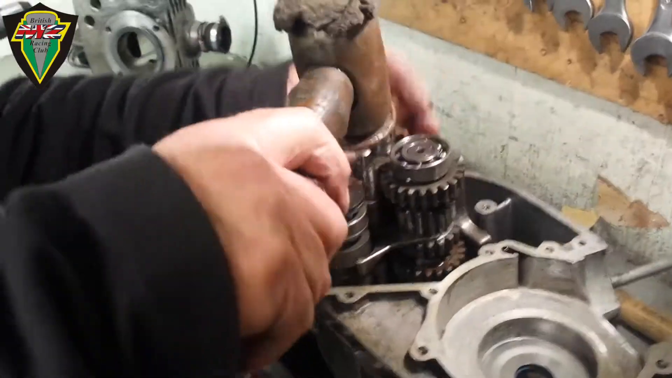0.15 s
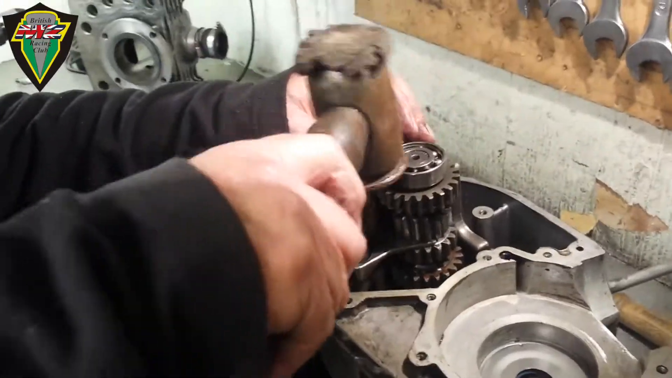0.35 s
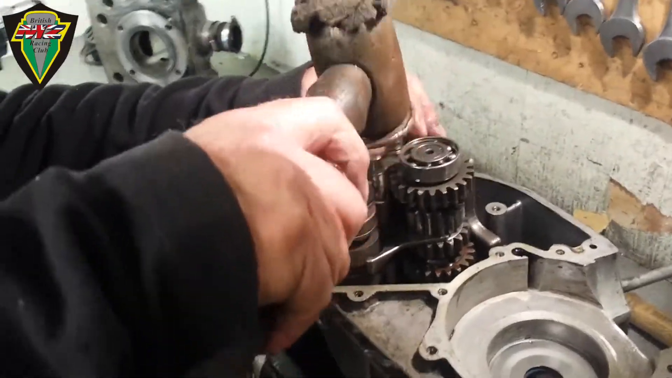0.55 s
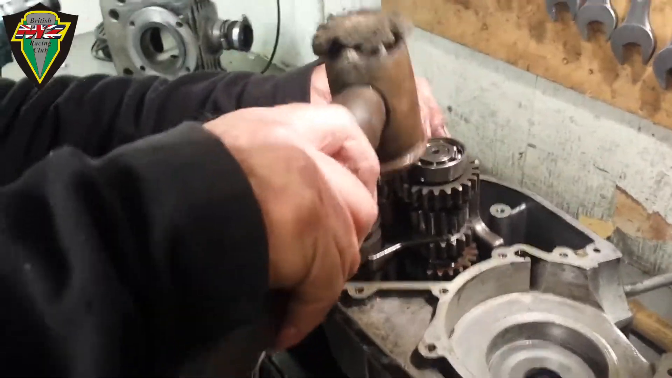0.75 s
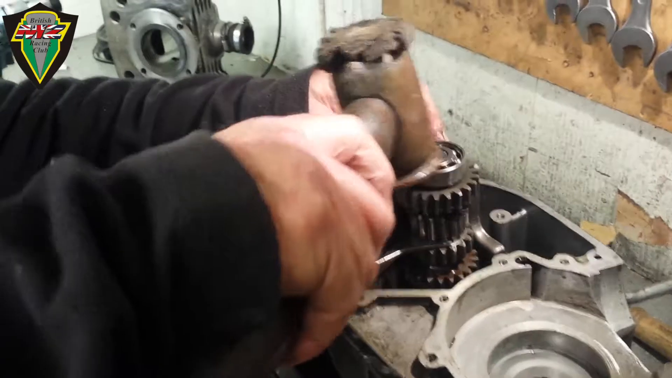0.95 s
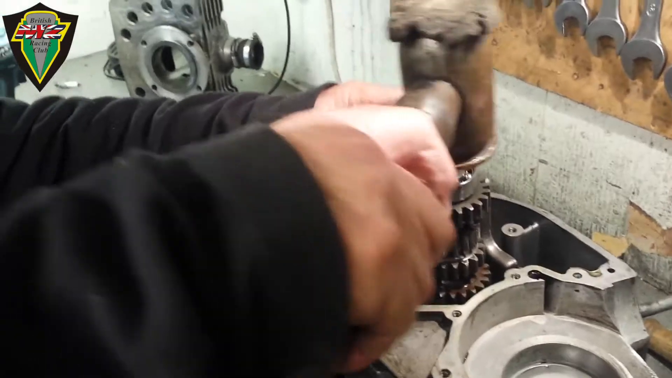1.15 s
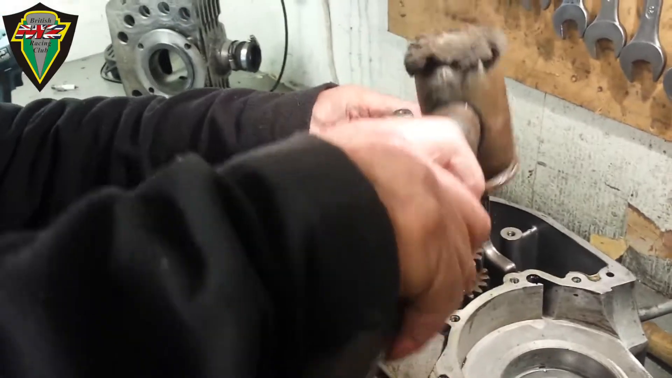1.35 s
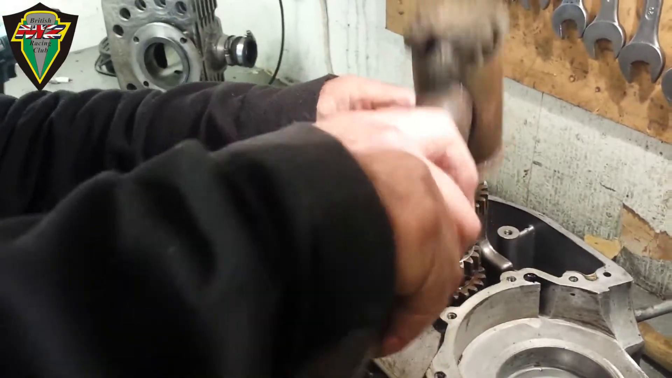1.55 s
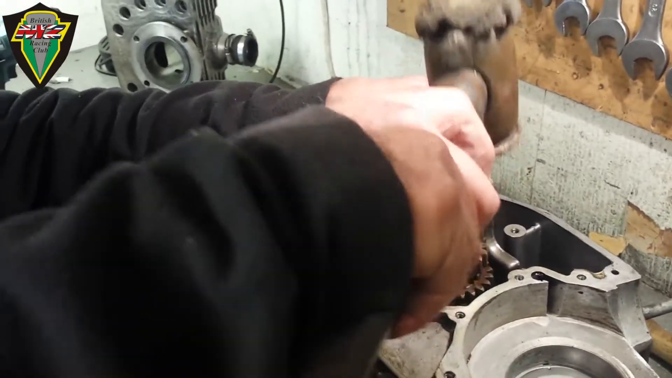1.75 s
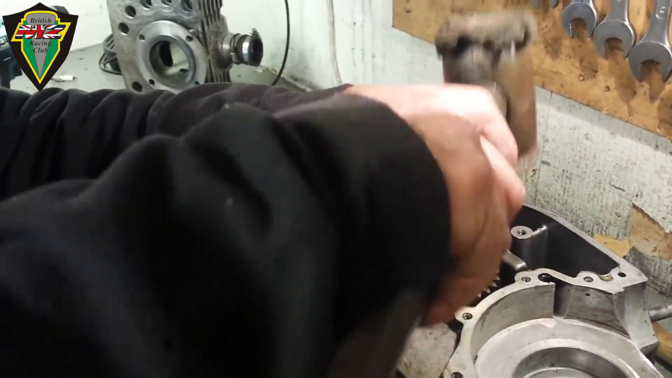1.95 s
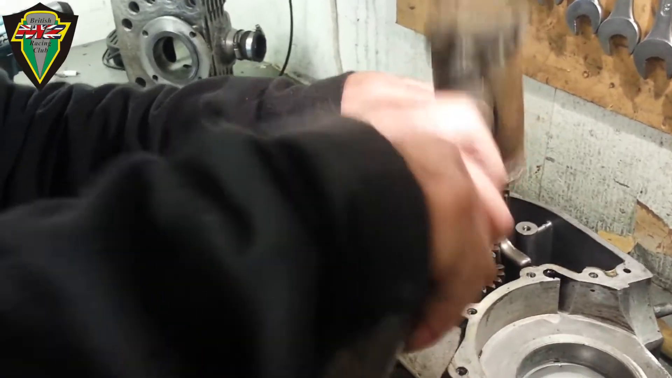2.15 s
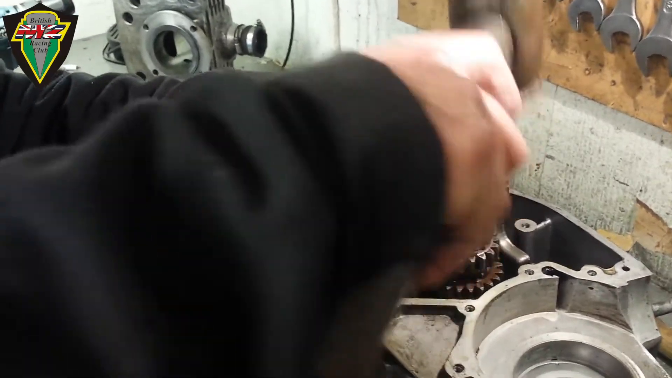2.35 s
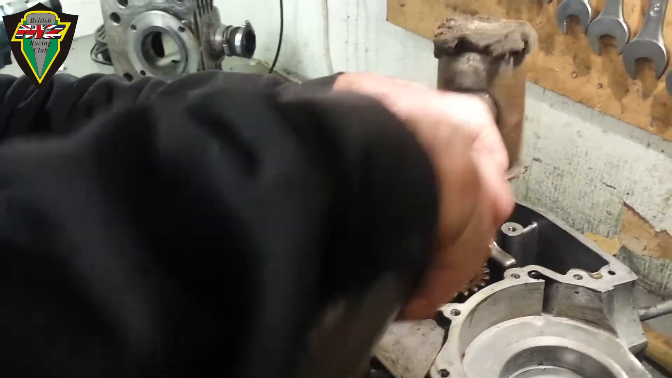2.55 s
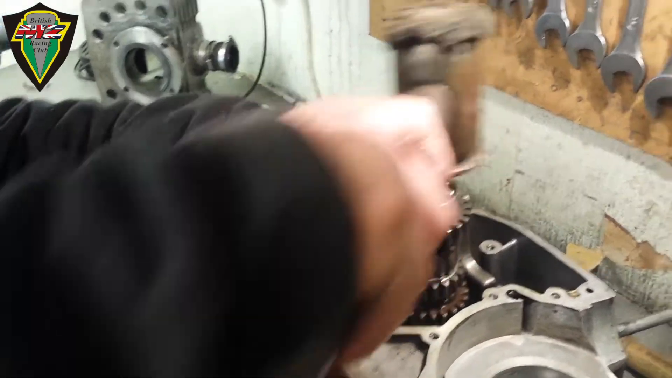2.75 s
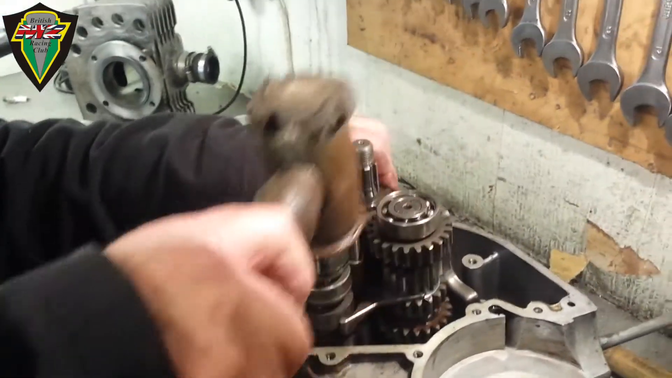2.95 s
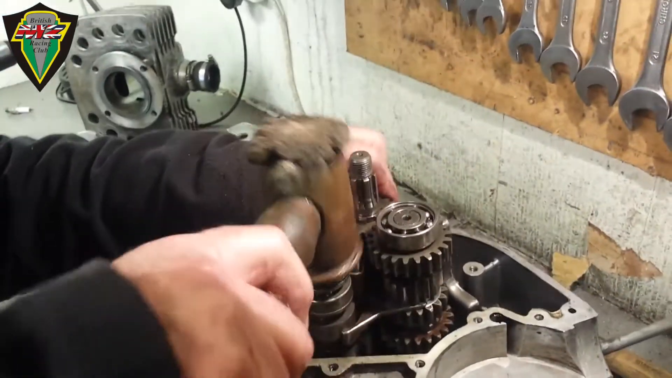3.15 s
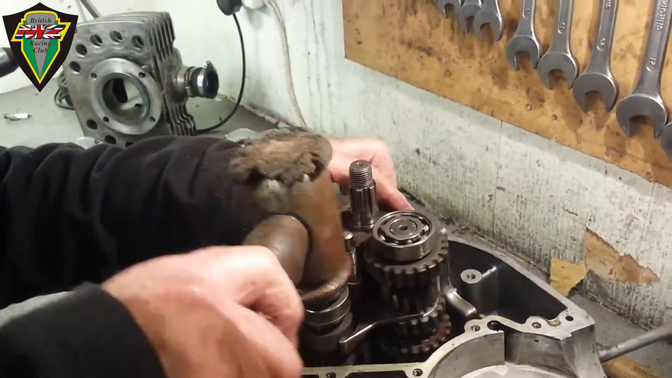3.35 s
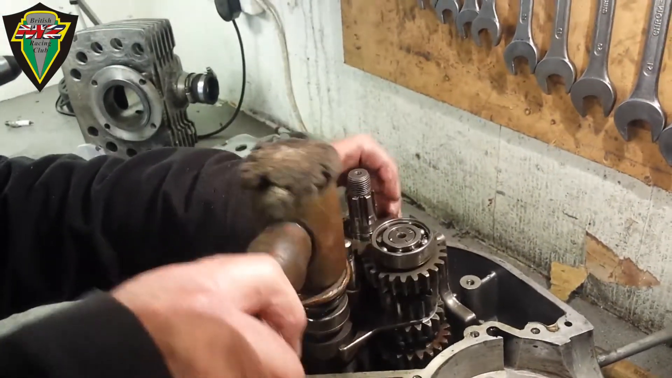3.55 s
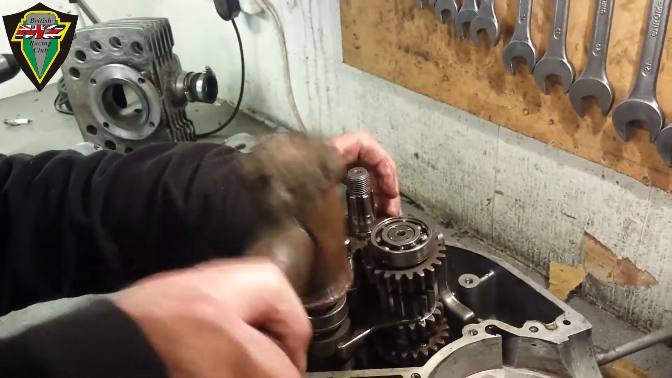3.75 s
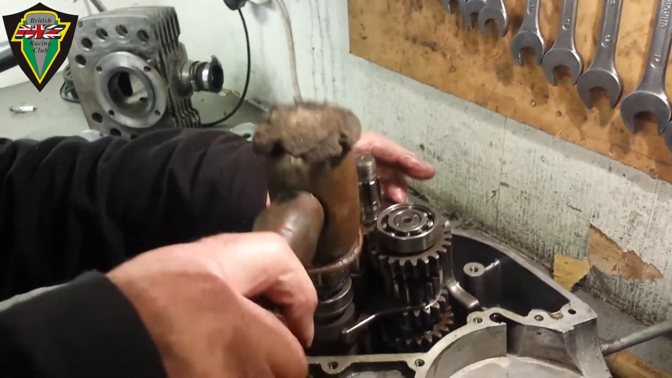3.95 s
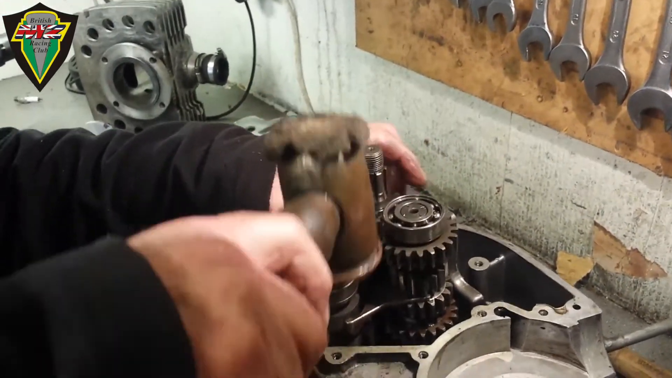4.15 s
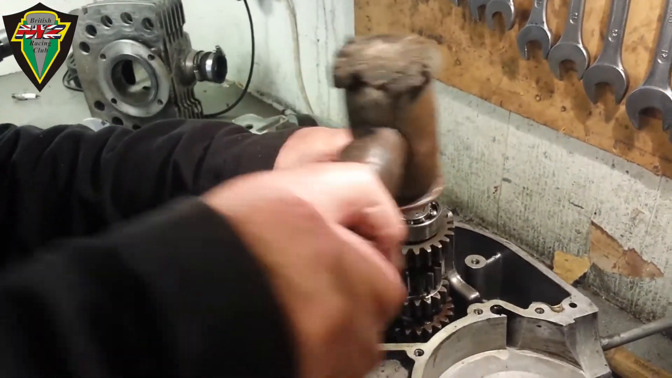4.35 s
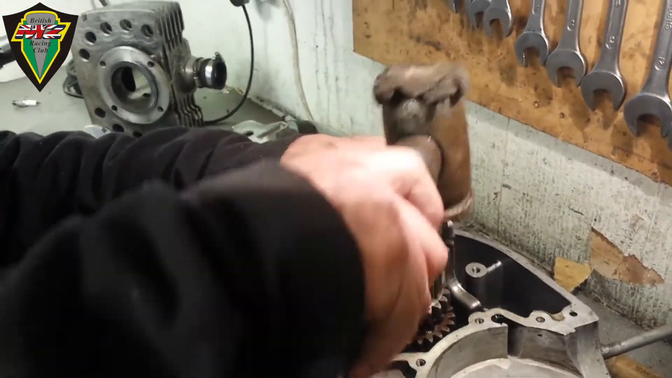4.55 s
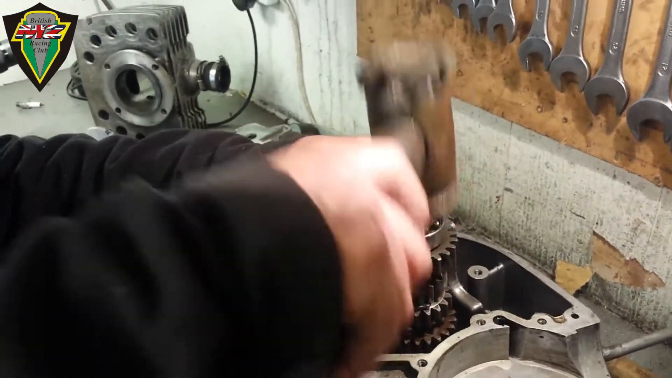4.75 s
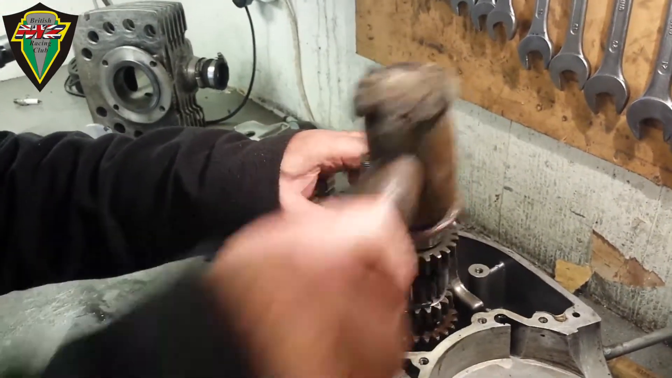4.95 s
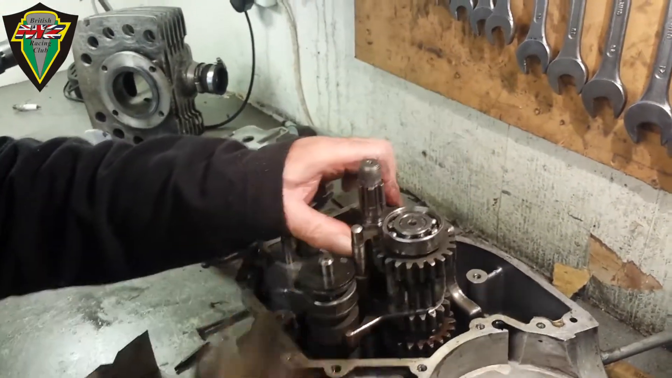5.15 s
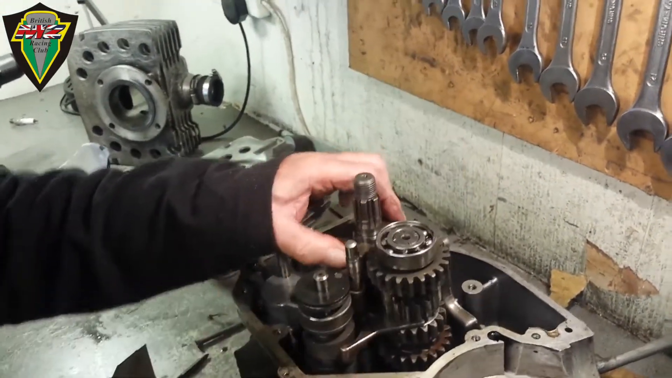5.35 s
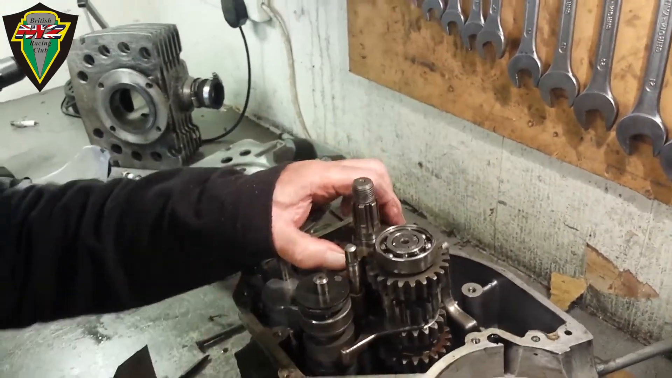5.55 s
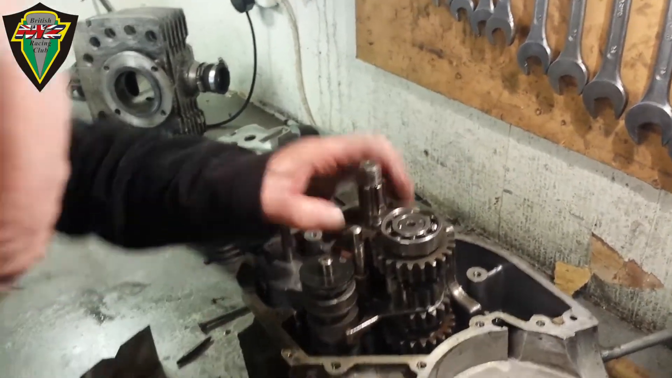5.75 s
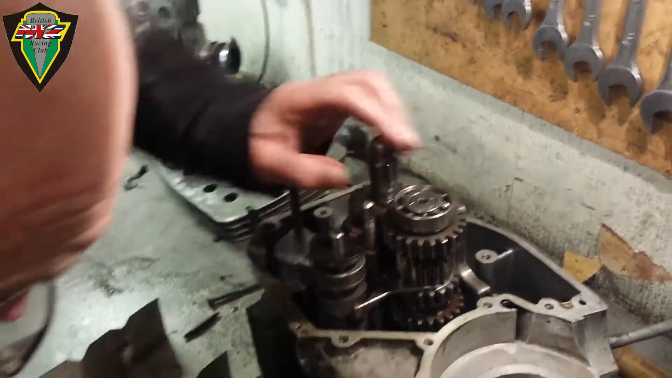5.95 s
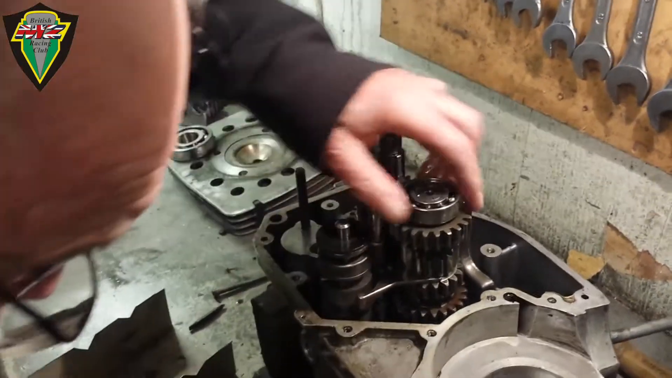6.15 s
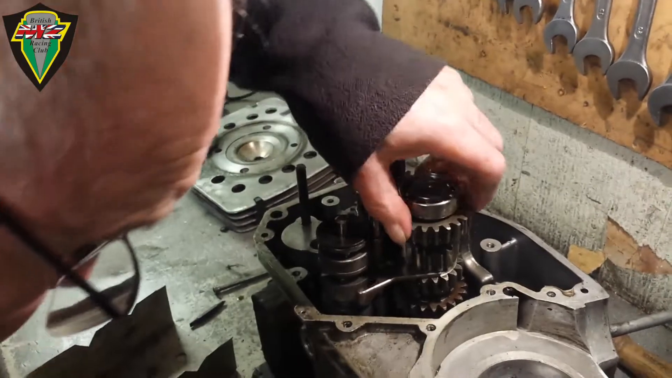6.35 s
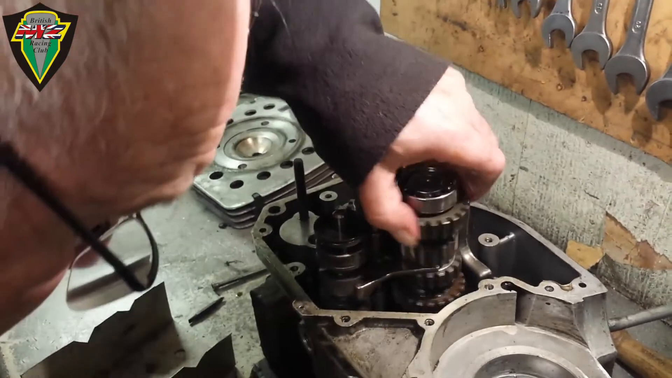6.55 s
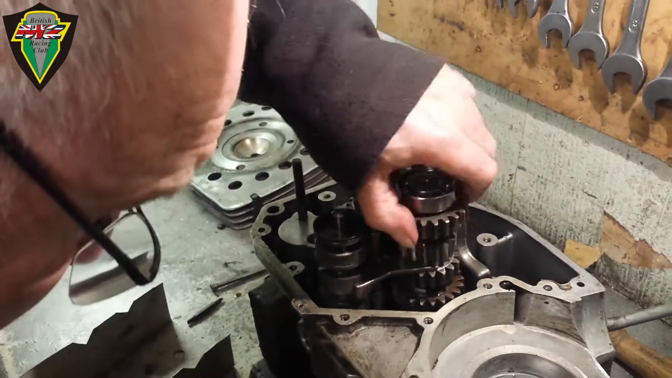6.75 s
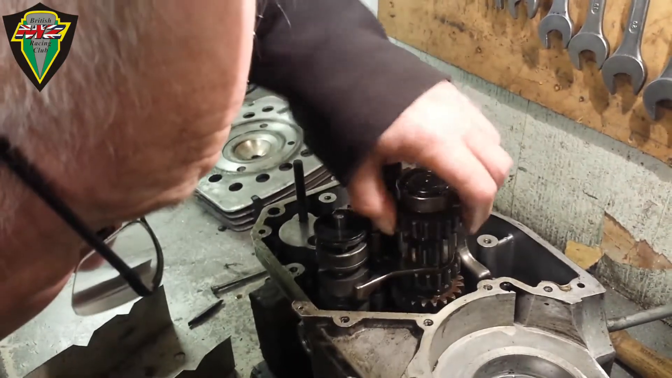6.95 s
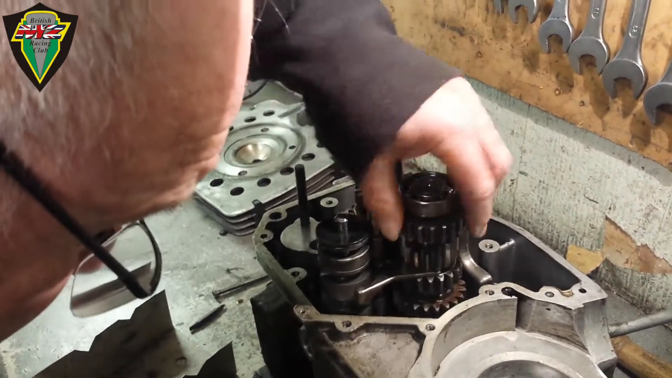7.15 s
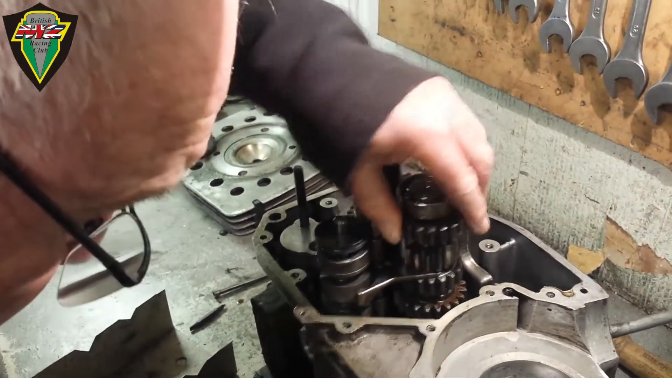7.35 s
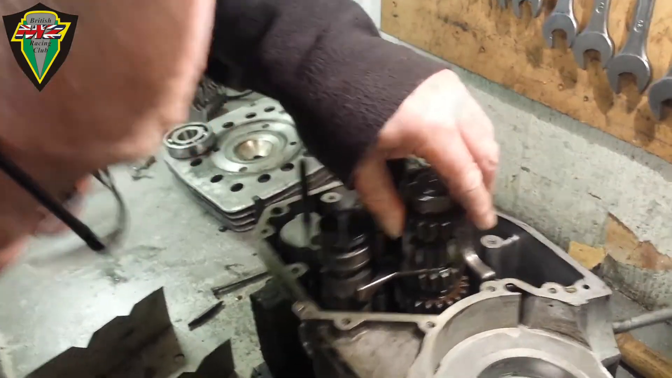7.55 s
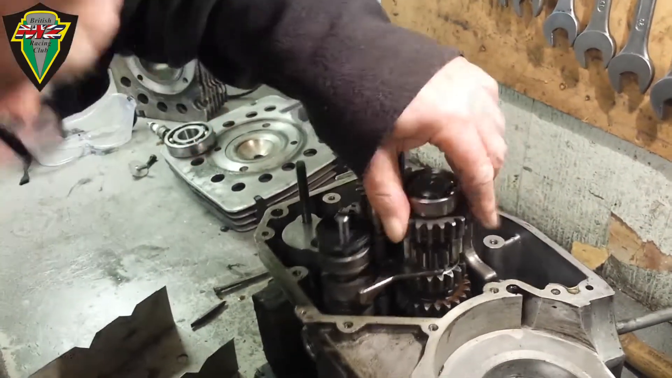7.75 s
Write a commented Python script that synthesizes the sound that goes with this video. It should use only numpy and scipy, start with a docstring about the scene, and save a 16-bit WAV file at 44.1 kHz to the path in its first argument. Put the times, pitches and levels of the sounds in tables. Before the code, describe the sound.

A run of light, slightly uneven hammer taps clanks on steel shafts in an engine casing, each ringing briefly and thudding through the workbench. After about five seconds the hammer clunks down on the bench. Quieter, irregular clicking and rattling follows as the gears are turned by hand, with low bumps from the rocking casing. The microphone is close, in a small room with faint background hum and hiss.

```python
"""In a small workshop, close to a workbench, a hammer taps gear shafts into an open engine casing.
Each blow chatters through the loose gears, rings the casing and the hammer head, and thumps the bench.
The hammer is laid down, then a hand turns the gears: teeth click and rub, and the casing rumbles
on the bench. Behind it all, a murmur, hum and hiss sink during the hammering and swell back after it."""
import sys
import numpy as np
from scipy import signal
from scipy.fft import rfft, irfft
from scipy.io import wavfile

SR = 44100
rng = np.random.default_rng(int(sys.argv[2]) if len(sys.argv) > 2 else 0)


def digitize_waveform(pressure):
    """Quantize a signal to 16-bit integers and store it at the path in sys.argv[1].

    Rows of a 2-D input are taken as channels; values are limited to [-1, 1].
    """
    field = np.atleast_2d(pressure).T
    bounded = np.clip(field, -1, 1)
    quanta = np.round(bounded * 32767).astype(np.int16)
    wavfile.write(sys.argv[1], SR, quanta)


N = 344421
AGE = np.arange(int(.7 * SR)) / SR  # seconds since a hit began

# Levels in the tables compare one row with another. t60 is the time a ring takes to fade by 60 dB.
# hammer blows: t/s, spot, clang/dB, thud/dB, brightness/dB, head ring/dB, favoured casing pitch f/Hz
HAMMER_BLOWS = [(.4335, "shaft", -30.5, -27, 4, -56, 2530), (.7365, "shaft", -30, -13, 10.5, -55, 4050),
                (.9645, "shaft", -28, -17, 2.5, -40, 3300), (1.3865, "bearing", -19, -15, 3, -36, 1780),
                (1.682, "bearing", -21.5, -20, -5, -45, 1780),
                (1.969, "bearing", -21, -20.5, -3.5, -35.5, 3300),
                (2.269, "bearing", -21.5, -20, 0, -32.5, 2300),
                (2.5982, "bearing", -16.5, -14.5, 1, -31.5, 2320),
                (3.214, "drum", -45, -35, -30.5, -79, 2100), (3.402, "drum", -29, -26, 1, -55, 2500),
                (3.602, "drum", -24, -21.5, 2.5, -38, 2800), (3.8755, "drum", -22, -20.5, -5, -56, 2310),
                (4.1445, "drum", -17, -21, -13.5, -39, 2330), (4.5804, "gears", -25, -18.5, 6.5, -34, 2810),
                (4.9253, "gears", -21, -17.5, 2, -52, 2800)]
# the hammer lands on the bench and tips over: same columns
HAMMER_LANDINGS = [(5.575, "bench", -33, -18.5, -9.5, -32, 2800),
                   (5.805, "bench", -45.5, -19.5, 8, -37.5, 1360), (5.85, "bench", -51, -27, -8, -70, 1360),
                   (5.884, "bench", -46, -29, -11, -63, 1360)]
# how each struck spot sounds, by name: knock/dB, tick/dB, bench sway/dB (added to the thud level)
STRUCK_SPOTS = {"shaft": (-6.5, .5, -2), "bearing": (-13, -8, -11), "drum": (-5.5, -4.5, -8),
                "gears": (-7, -7.5, -13), "bench": (-0.64, -1.06, -18)}
# a blow sets a loose gear ringing: t/s, level/dB
LOOSE_GEAR_RINGS = [(2.825, -48), (3.216, -48), (3.877, -33), (4.146, -38)]
# the clearest gear teeth meeting: t/s, level/dB, sizzle/dB (added to the level)
TOOTH_CLICKS = [(2.149, -55, -28), (2.8238, -45.5, -2), (3.0058, -55.5, -25), (3.817, -46.5, -27.5),
                (3.9682, -46, -25), (5.3532, -51.5, -33), (5.7264, -55, -32), (6.4857, -43.5, -6),
                (6.7356, -30.5, -34), (6.8919, -32.5, -34), (6.9161, -35, -16), (6.9353, -25, -21),
                (7.003, -31.5, -6.5), (7.0828, -40, -12), (7.134, -41, -10), (7.3244, -35, -30),
                (7.376, -25, -16), (7.4444, -27.5, -18), (7.4929, -29.5, -10), (7.5136, -33.5, -14),
                (7.5639, -32, -32), (7.6125, -31.5, -9.5), (7.675, -33, 0.5), (7.8008, -31.5, -38)]
# the casing rocks on the bench: t/s, level/dB
CASING_BUMPS = [(.009, -35), (6.933, -35), (7.422, -28.5), (7.578, -33.5), (7.715, -26), (7.793, -26.5)]
# how hard the hand turns the gears: t/s, effort/dB
HAND_EFFORT = [(6.7, -8), (6.87, -23), (6.95, -3), (7.12, -17.5), (7.29, -14), (7.39, -1), (7.6, -1.5),
               (7.81, -6.5)]

# A mode is one of the tones an object rings with when it is struck.
# shafts and casing: f/Hz, level/dB, t60/s
CASING_MODES = [(760, -12, .06), (890, -12, .06), (1360, -9, .05), (1780, 2, .07), (2060, -4, .09),
                (2320, 2, .07), (2560, -5, .06), (2805, -1.5, .06), (3310, -3, .06), (4060, -7, .04),
                (4550, -8, .04), (5045, -9, .04), (5370, -10, .04), (6950, -13, .04)]
# hammer head: f/Hz, level/dB, t60/s
HEAD_MODES = [(5480, -16, .1), (5645, 0, .14), (5700, -5, .09), (7780, -14, .12), (11350, -15, .1),
              (13065, -14, .12), (14850, -24, .1)]
# a loose gear: f/Hz, level/dB, t60/s
GEAR_MODES = [(2062, 0, .48), (2300, -8, .3), (2570, -5, .42)]
# bench and casing as one heavy body: f/Hz, level/dB, t60/s
BENCH_MODES = [(135.2, 0.5, 0.12), (169.4, 1.5, 0.071), (210.9, 7, 0.053), (252.3, -4, 0.1), (279, -4, 0.1),
               (307.7, -3, 0.091), (342.4, -6.5, 0.11), (382.6, -10.5, 0.08), (452.5, -12.5, 0.066),
               (531.8, -17, 0.14), (623.3, -22, 0.2)]
# the bench top under the falling hammer: f/Hz, level/dB, t60/s
BENCH_TOP_MODES = [(147, 8, 0.07), (199, 14.5, 0.033), (298, 2, 0.093), (337, 8.5, 0.078),
                   (398.6, -5.5, 0.21), (499, 10.5, 0.033), (543, 1, 0.042), (610, 2, 0.069)]
# the whole bench swaying on its legs: f/Hz, level/dB, t60/s
SWAY_MODES = [(44.6, -3.5, 0.18), (58.5, -3, 0.55)]

# A spectrum says how strong a sound is from low pitch to high.
# dense ring of all the gears together: f/Hz, level/dB
METAL_SPECTRUM = [(150, -18.5), (400, 3), (700, 12), (1100, 6), (1900, 8), (3000, -1), (4500, -6),
                  (6300, -6), (8000, -18), (11000, -22), (15000, -37.5)]
# teeth clicking and rubbing: f/Hz, level/dB
TEETH_SPECTRUM = [(530, -10), (900, -8), (989, -15), (1600, 2), (1850, 5.5), (2850, 2), (3030, -2.5),
                  (4900, -1), (8430, -24.5), (11200, -40), (15000, -53)]
# the casing rumbling on the bench: f/Hz, level/dB
RUMBLE_SPECTRUM = [(18, -26), (30, -19), (54, 4), (86, -11.5), (130, 4.5), (183, -10.5), (220, -1.5),
                   (366, -10.5), (407, -14), (538, -24), (1200, -29), (1560, -41), (2640, -120)]
# low workshop murmur: f/Hz, level/dB
MURMUR_SPECTRUM = [(15, -27), (25, 1), (115, -1.5), (297, -3.5), (350, 6.5), (391, -2), (703, -3.5),
                   (814, -14), (943, -9.5), (1360, -16.5), (1760, -25.5), (2000, -26), (2600, -70.5),
                   (4400, -120)]
# background hiss: f/Hz, level/dB
HISS_SPECTRUM = [(880, -3), (1500, 1.5), (1750, -9), (1900, -2), (4310, -5.5), (8460, -11.5), (9890, -10),
                 (15500, -19)]
# faint tones of hum and whine: f/Hz, level/dB (compared with the murmur)
HUM_TONES = [(119, -5), (345, -14), (495, -9.5), (9991, -26)]
# the metal as the two sides of the microphone hear it: f/Hz, left minus right/dB
STEREO_BALANCE = [(200, -0.5), (800, -3), (1400, -2), (2400, 5), (5500, 11.5), (7500, 0), (9500, -6),
                  (15000, 4.5)]

ROOM_T60_S, BASS_T60_S = 0.28, 0.39  # the room holds deep sounds longer
RUB_DB, RUMBLE_DB = -40, -29.5  # turning gears, at an effort of 0 dB


def hammer():
    """The hammer taps the shafts, then drops onto the bench; each hit shakes both metal and wood."""
    metal, wood = np.zeros((2, N)), np.zeros((2, N))
    gear_train = burst(0.043)
    for hits, body, lag_s in ((HAMMER_BLOWS, BENCH_MODES, .0028), (HAMMER_LANDINGS, BENCH_TOP_MODES, .0006)):
        for s, spot, db, thud_db, *tone in hits:
            *_, sway_db = STRUCK_SPOTS[spot]
            add(metal, s, clang(gear_train, spot, db, thud_db, *tone))
            add(wood, s, thud(body, thud_db, lag_s) + sway(thud_db + sway_db))
    for s, db in LOOSE_GEAR_RINGS:
        add(metal, s, attack_level(ring(GEAR_MODES, scatter_db=1, detune=.001), db))
    return at_microphone(metal) + wood


def clang(gear_train, spot, db, thud_db, bright_db, head_db, favoured_hz):
    """Chattering contacts ring the casing and gears; the hammer head rings too, and the room answers."""
    dense = gear_train + undb(-11) * burst(0.02) + undb(18.5) * burst(0.04, channels=2)
    dense = attack_level(colour(dense, METAL_SPECTRUM), 0)
    casing = casing_ring(favoured_hz)
    metal = attack_level(convolve(dense + undb(-1) * casing, chatter(spread_s=.0052)), 0)
    echo = attack_level(colour(afterglow(ROOM_T60_S, wet_db=0, build_s=0.0064), METAL_SPECTRUM), -11)
    # part of the echo keeps the pitches of the casing
    echo += attack_level(convolve(afterglow(0.18, wet_db=0, build_s=0.0021), casing), -15)
    # a heavy blow knocks more, a hard contact is brighter
    knock_db, tick_db, _ = STRUCK_SPOTS[spot]
    band_dbs = [knock_db + .7 * (thud_db - db), 3.2, tick_db + 6 + .4 * bright_db, bright_db - 13]
    strike = sum(attack_level(band, db + band_db) for band, band_db in zip(bands(metal + echo), band_dbs))
    head = ring(HEAD_MODES, scatter_db=1.5, detune=.001)
    head = colour(head, [(6000, 0.008), (12000, .6 * bright_db - 3.5)])
    return strike + attack_level(head, head_db + 6.5)


def casing_ring(favoured_hz, boost_db=7, width_octaves=.1):
    """The casing rings, most strongly in the modes near one pitch."""
    modes = [(hz, db + boost_db * np.exp(-(np.log2(hz / favoured_hz) / width_octaves) ** 2), t60)
             for hz, db, t60 in CASING_MODES]
    return attack_level(ring(modes, scatter_db=2.5, detune=0.0074), 0)


def chatter(spread_s, count=6):
    """After the first contact, loose gears and shafts knock together for a few milliseconds."""
    contacts = np.zeros(len(AGE))
    contacts[0] = 1
    late, strength = rng.random((count, 2)).T
    times = (np.arange(count) + late) / count * spread_s
    contacts[(times * SR).astype(int)] += .5 + strength
    return contacts


def thud(modes, db, lag_s):
    """The heavy bench follows a moment after the blow; its close tones beat into a second swell."""
    body = delay(ring(modes, scatter_db=2, detune=0.017) * rise(0.003), lag_s)
    # trim the deepest bass so the thud stays tight
    body = colour(body, [(40, -23.5), (85, -11), (125, 1)])
    in_room = room(body, BASS_T60_S, wet_db=-3.5, build_s=0.0091)
    # the deepest sound reaches left and right alike
    middle = in_room.mean(axis=0)
    sides = colour(in_room - middle, [(60, -20.5), (150, -12.5), (400, -9.5)])
    return attack_level(middle + sides, db)


def sway(db):
    """The bench wobbles on its legs: a deep tone that builds up after the blow."""
    return undb(db) * ring(SWAY_MODES, scatter_db=1, detune=.01) * rise(.025)


def gear_clicks():
    """Loose teeth meet with short ticks that ring the gears; now and then the casing rocks."""
    metal, wood = np.zeros((2, N)), np.zeros((2, N))
    for s, db in CASING_BUMPS:
        add(wood, s, thud(BENCH_MODES, db, lag_s=0.00034))
    for s, db, sizzle_db in TOOTH_CLICKS + rattle():
        tooth = burst(0.0076) + undb(-1) * burst(0.033, channels=2)
        contact = attack_level(convolve(tooth, chatter(spread_s=0.005, count=2)), 0)
        click = colour(contact + afterglow(0.14, wet_db=-1.5, build_s=0.0095), TEETH_SPECTRUM)
        knock, body, tick, sizzle = bands(click)
        add(metal, s, attack_level(knock, db - 11) + attack_level(body + tick, db - 2))
        add(metal, s, attack_level(sizzle, db + sizzle_db - 3))
        # the fingers damp the gear, so it only clinks
        clink = ring(GEAR_MODES, scatter_db=3, detune=.03) * fade(.18)
        add(metal, s, attack_level(clink, db - 8))
    return at_microphone(metal) + wood


def rattle(clicks_per_s=36):
    """Smaller clicks at uneven times, louder as the hand turns harder; rows like TOOTH_CLICKS."""
    s, effort_db = np.transpose(HAND_EFFORT)
    count = int((s[-1] - s[0]) * clicks_per_s)
    late, strength = rng.random((count, 2)).T
    times = s[0] + (np.arange(count) + late) / clicks_per_s
    levels_db = RUB_DB + 7 + np.interp(times, s, effort_db) + 2 * strength
    return [(t, db, -20) for t, db in zip(times, levels_db)]


def turning_gears(grains_per_s=1200):
    """Rolling teeth rub in tiny grains and shake the casing; both follow the effort of the hand."""
    s, efforts_db = np.transpose(HAND_EFFORT)
    effort_db = np.interp(np.arange(N) / SR, s, efforts_db)
    touch = ramp(s[0], s[0] + 0.097)
    grain_starts = rng.random(N) < grains_per_s / SR
    grain_db = 3 * np.minimum(rng.exponential(size=N), 4)
    grains = grain_starts * undb(grain_db) * rng.standard_normal(N)
    singing = convolve(grains, ring(GEAR_MODES, scatter_db=2, detune=.004) * fade(.25))
    rub = level(colour(grains, TEETH_SPECTRUM), 0) + level(singing, -2)
    rub = at_microphone(level(room(rub, ROOM_T60_S, wet_db=-18, build_s=0.0044), RUB_DB))
    rumble = level(colour(stereo_noise(shared=1, separate=0.068), RUMBLE_SPECTRUM), RUMBLE_DB)
    return touch * (rub * undb(.9 * effort_db) + rumble * undb(effort_db))


def background():
    """Workshop murmur, hum and hiss sink during the hammering and swell back afterwards."""
    dip = ramp(start_s=0.51, end_s=2.41) - ramp(start_s=4.99, end_s=7.2)
    murmur = level(colour(stereo_noise(shared=1, separate=0.28), MURMUR_SPECTRUM), 0)
    hum = sum(undb(db) * np.sin(2 * np.pi * hz * np.arange(N) / SR) for hz, db in HUM_TONES)
    hiss = level(colour(stereo_noise(shared=0.39, separate=1), HISS_SPECTRUM), 0)
    return (murmur + hum) * undb(-45 - 18.5 * dip) + hiss * undb(-48 - 17.5 * dip)


def room(x, t60, wet_db, build_s):
    """Add the workshop's echo to a sound; wet_db says how strong the echo is."""
    tail = afterglow(t60, 0, build_s)
    return x + undb(wet_db) * convolve(x, tail / np.sqrt(np.sum(tail ** 2) / 2))


def afterglow(t60, wet_db, build_s):
    """The blurred echo that the walls return after a short crack, different left and right."""
    return undb(wet_db) * burst(t60, channels=2) * rise(build_s)


def at_microphone(x, lag_s=.00015):
    """High sounds from the casing reach the left side first, and each side is shaded differently."""
    knock, *upper_bands = bands(x)
    treble = sum(upper_bands)
    left, right = knock + np.array([treble[0], np.roll(treble[1], int(lag_s * SR))])
    return np.vstack([colour(channel, [(hz, side * db / 2) for hz, db in STEREO_BALANCE])
                      for channel, side in ((left, 1), (right, -1))])


def ring(modes, scatter_db, detune):
    """Fading tones; their strengths and pitches vary by chance, as with the place that is struck."""
    chance = rng.standard_normal((len(modes), 2))
    return sum(undb(db + scatter_db * a) * fade(t60) * np.sin(2 * np.pi * hz * (1 + detune * b) * AGE)
               for (hz, db, t60), (a, b) in zip(modes, chance))


def burst(t60, channels=1):
    """Fading noise: countless tones dying away together."""
    return rng.standard_normal((channels, len(AGE))) * fade(t60)


def stereo_noise(shared, separate):
    """Noise with one part common to both sides and one part different on each."""
    return shared * rng.standard_normal(N) + separate * rng.standard_normal((2, N))


def fade(t60):
    """Die away by 60 dB every t60 seconds."""
    return np.exp(-np.log(1000) * AGE / t60)


def rise(build_s):
    """Grow from 0 towards 1, quickly at first."""
    return 1 - np.exp(-AGE / build_s)


def ramp(start_s, end_s):
    """Rise evenly from 0 to 1 between two times."""
    return np.clip((np.arange(N) / SR - start_s) / (end_s - start_s), 0, 1)


def delay(x, s):
    """The same sound, s seconds later."""
    return np.interp(AGE - s, AGE, x, left=0)


def bands(x, edges_hz=(1300, 4000, 8000)):
    """Split a sound, from low to high, into knock, clang, tick and sizzle."""
    parts = []
    for hz in edges_hz:
        low, high = (signal.butter(2, hz, kind, fs=SR, output="sos") for kind in ("low", "high"))
        parts.append(signal.sosfilt(np.vstack([low, low]), x))
        x = signal.sosfilt(np.vstack([high, high]), x)
    return parts + [x]


def colour(x, points, size=4096):
    """Shape a sound's lows and highs along a curve of (f/Hz, level/dB) points."""
    hz, db = np.transpose(points)
    grid = np.log(np.arange(size // 2 + 1) * SR / size + 1)
    cepstrum = irfft(np.log(undb(np.interp(grid, np.log(hz), db))))
    # keep only the first half, so the filter never sounds ahead of a hit
    cepstrum[1:size // 2] *= 2
    cepstrum[size // 2 + 1:] = 0
    return convolve(x, irfft(np.exp(rfft(cepstrum))))


def convolve(x, response):
    """Let every sample of a sound set off a response, keeping the sound's length."""
    return signal.fftconvolve(np.atleast_2d(x), np.atleast_2d(response), axes=-1)[:, :x.shape[-1]]


def undb(db):
    """Turn decibels into a number to multiply by."""
    return 10 ** (np.asarray(db) / 20)


def level(x, db):
    """Set the average (rms) level of a steady sound."""
    return x * undb(db) / np.sqrt(np.mean(x ** 2))


def attack_level(x, db):
    """Scale a hit so that its first 25 ms have this average (rms) level."""
    return x * undb(db) / np.sqrt(np.mean(x[..., :SR // 40] ** 2))


def add(out, s, x):
    """Mix a short sound in at s seconds."""
    start = max(int(s * SR), 0)
    out[:, start:start + x.shape[-1]] += x[..., :max(N - start, 0)]


def scene():
    """Everything heard at the bench."""
    return hammer() + gear_clicks() + turning_gears() + background()


def record(dry, top_hz=15500):
    """Round off the loudest peaks and cut the highest treble."""
    rounded = 1.54 * np.tanh(dry / 1.33)
    return signal.sosfilt(signal.ellip(8, .2, 80, top_hz, fs=SR, output="sos"), rounded)


dry = scene()
out = record(dry)
digitize_waveform(out)
```